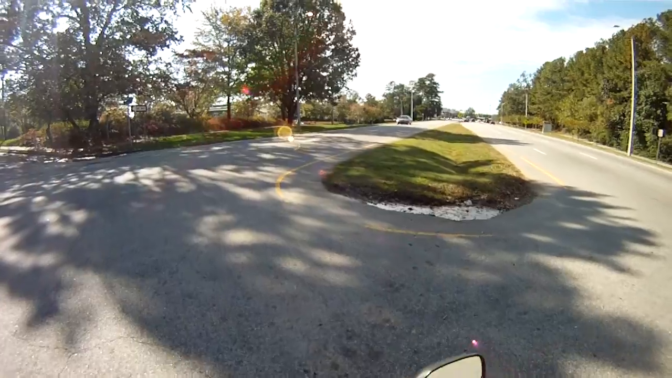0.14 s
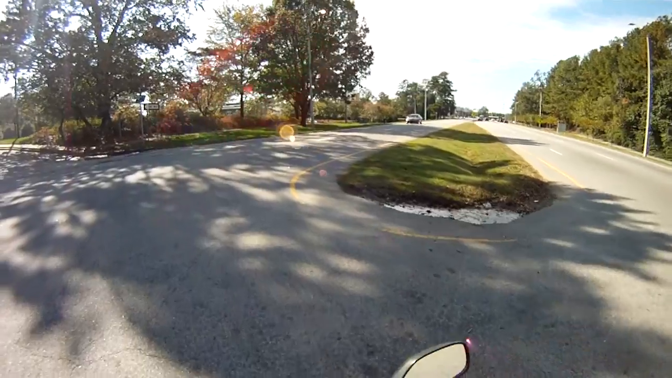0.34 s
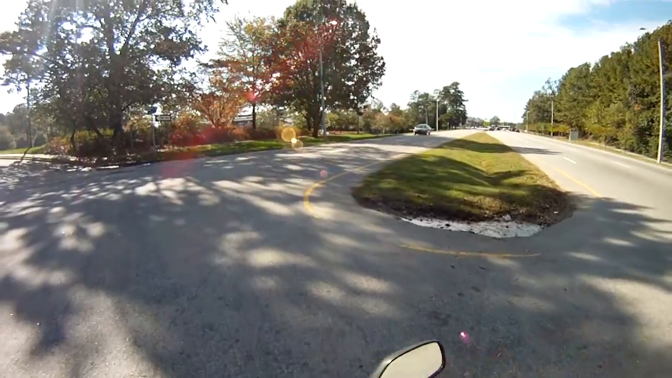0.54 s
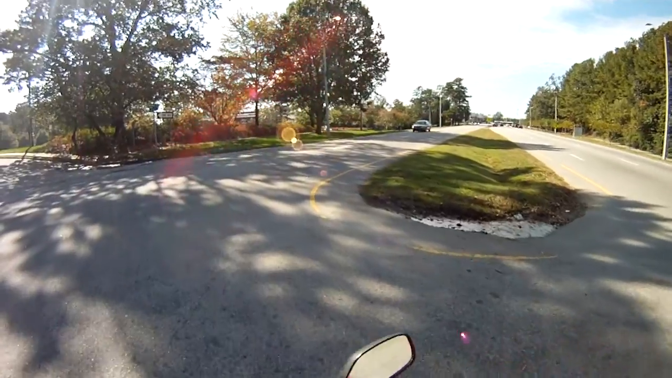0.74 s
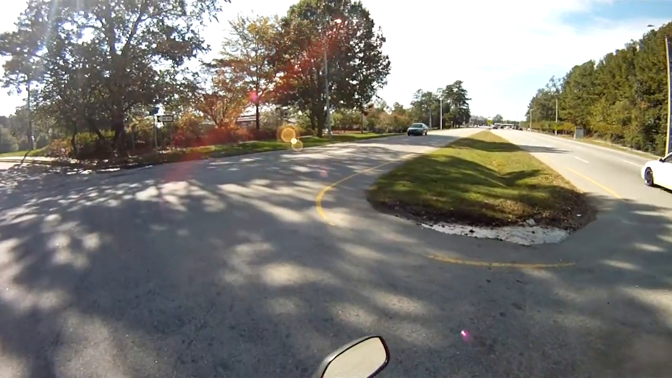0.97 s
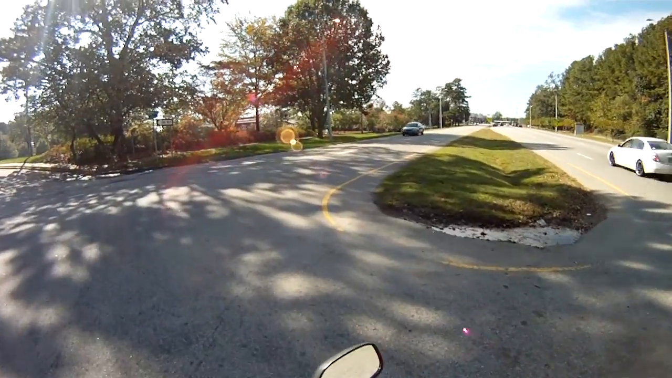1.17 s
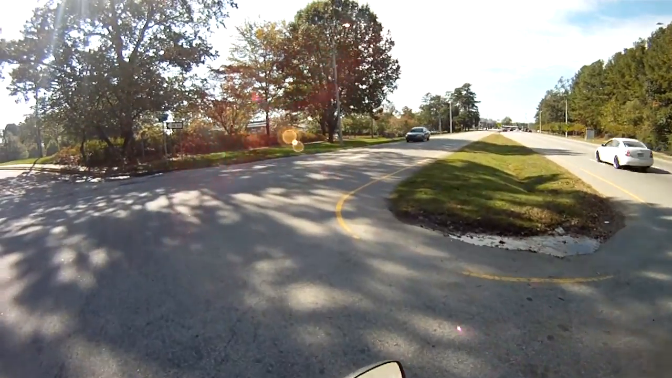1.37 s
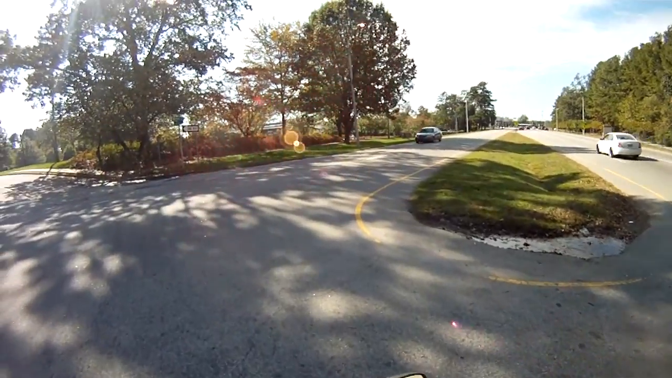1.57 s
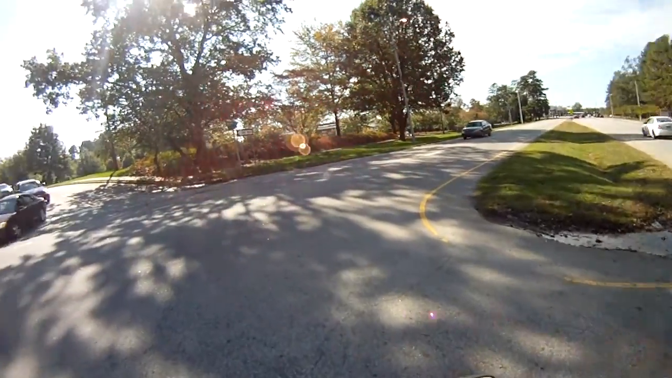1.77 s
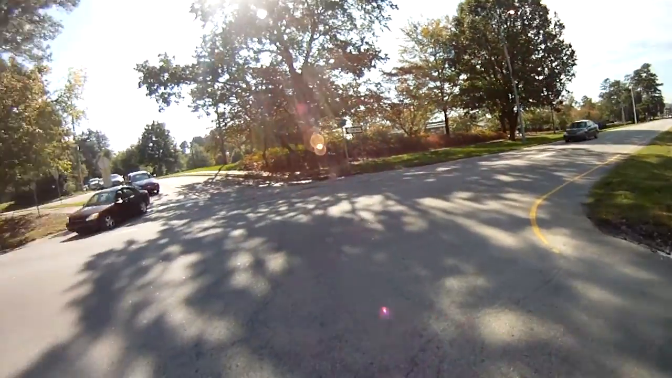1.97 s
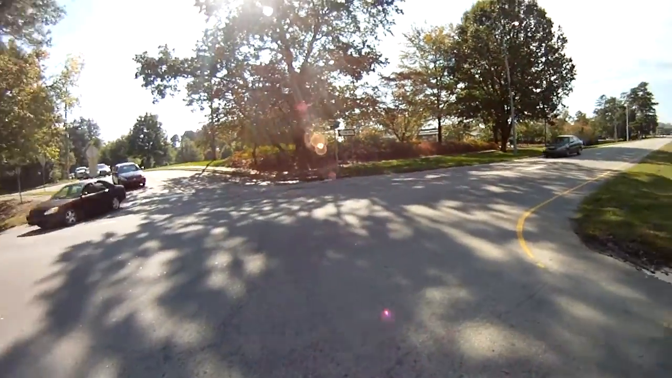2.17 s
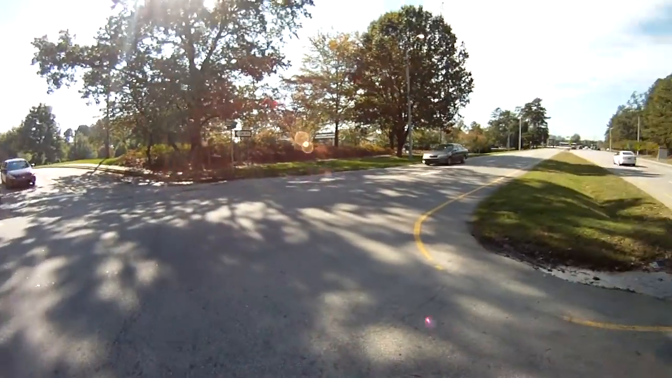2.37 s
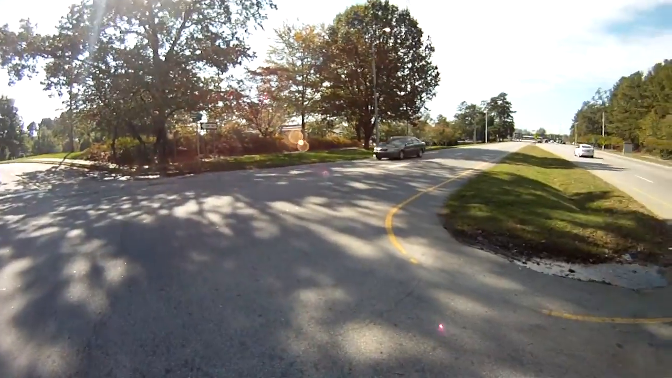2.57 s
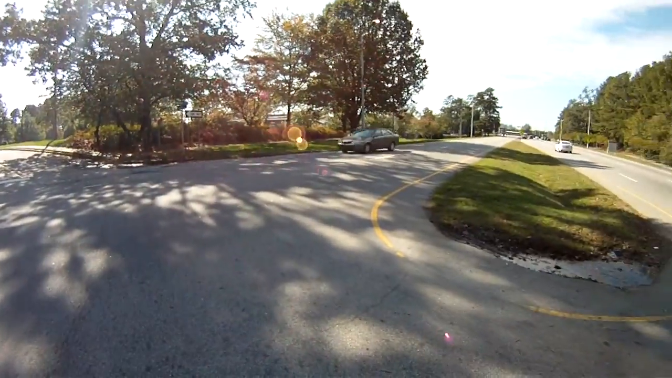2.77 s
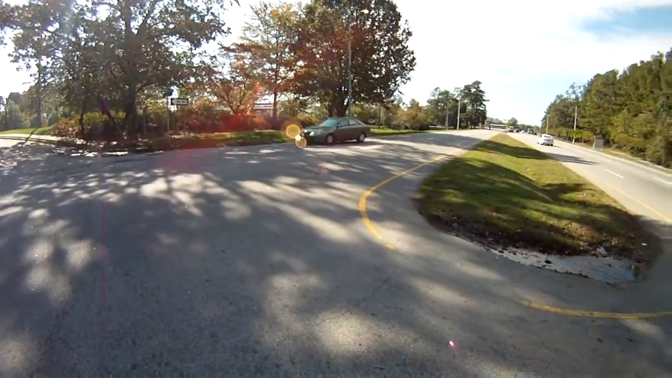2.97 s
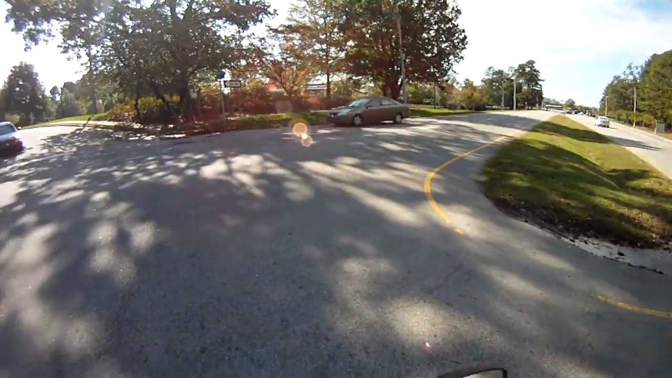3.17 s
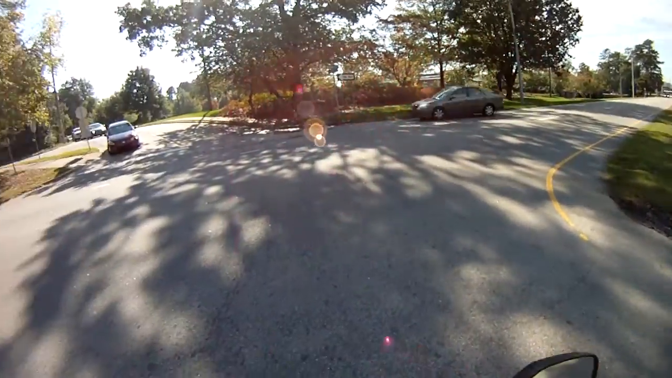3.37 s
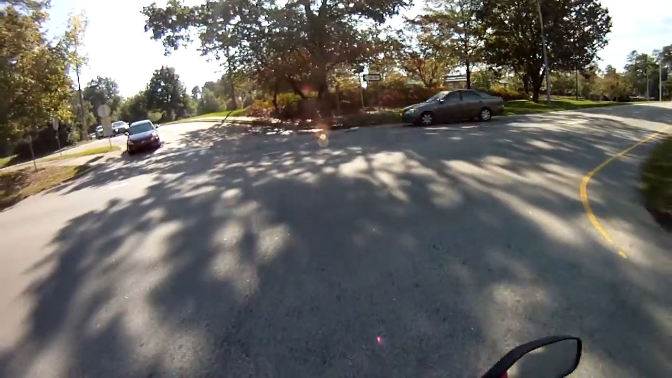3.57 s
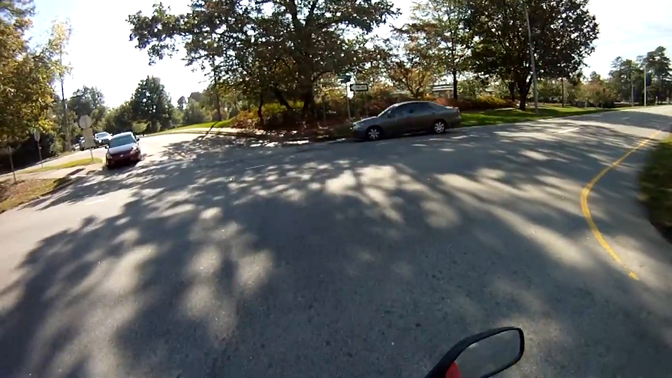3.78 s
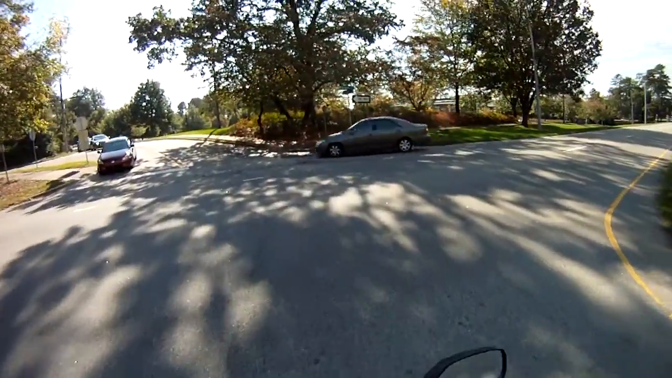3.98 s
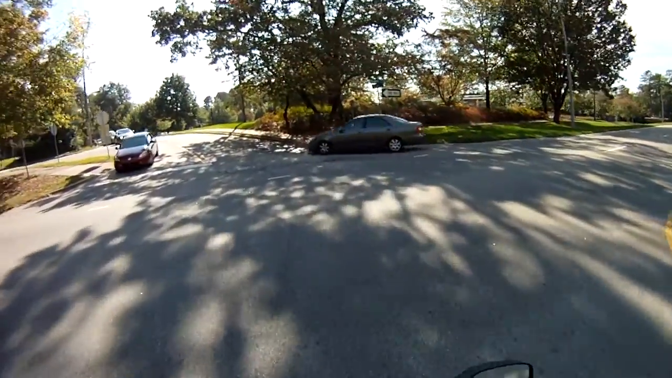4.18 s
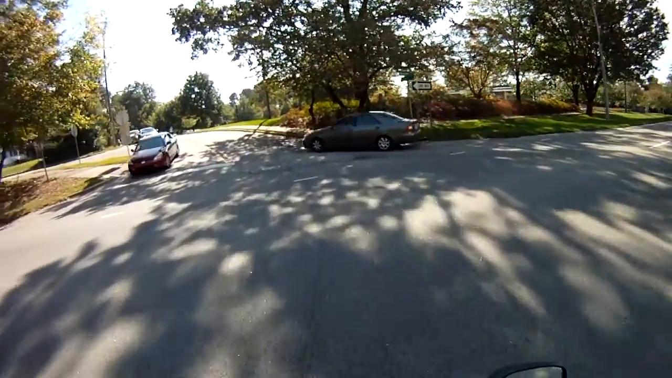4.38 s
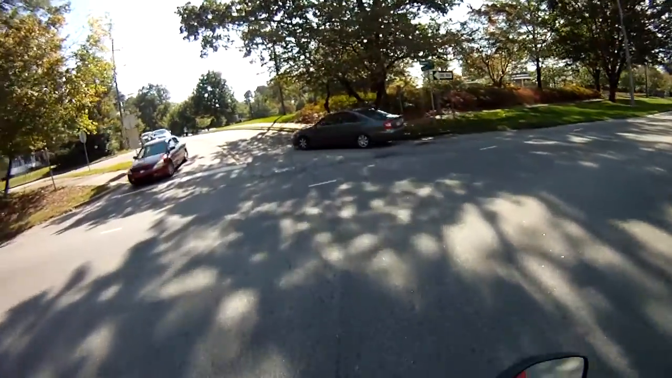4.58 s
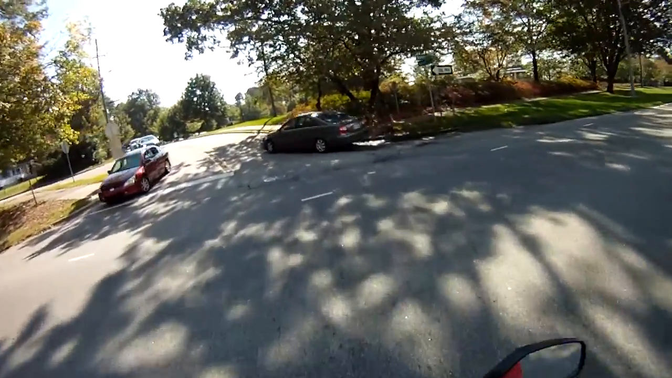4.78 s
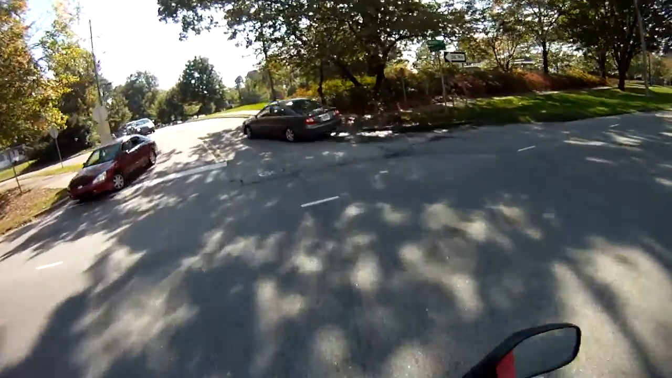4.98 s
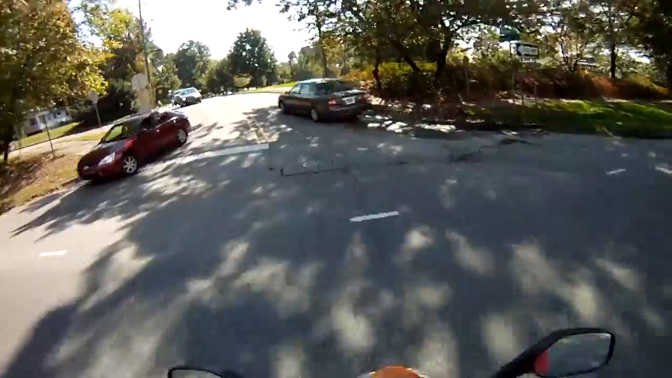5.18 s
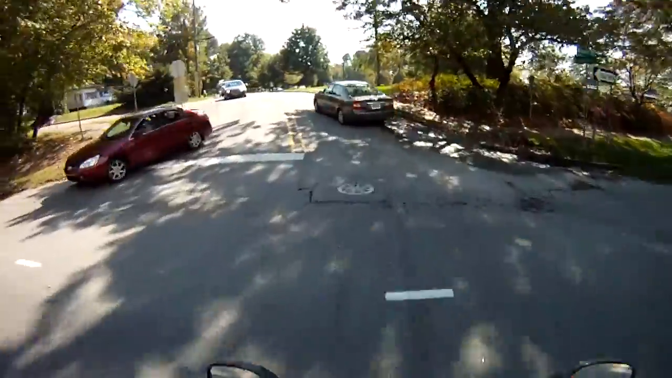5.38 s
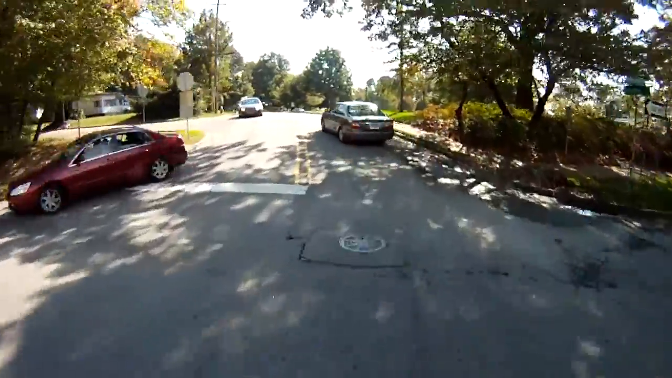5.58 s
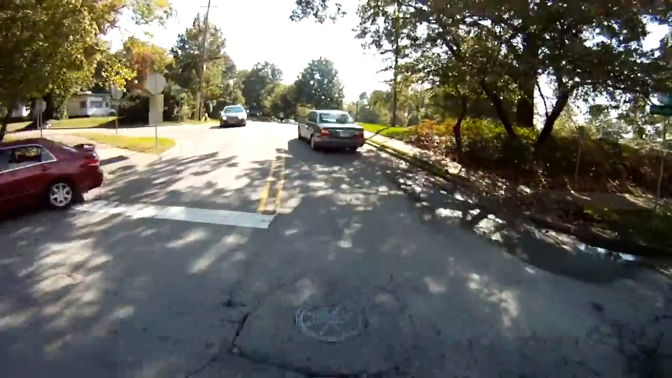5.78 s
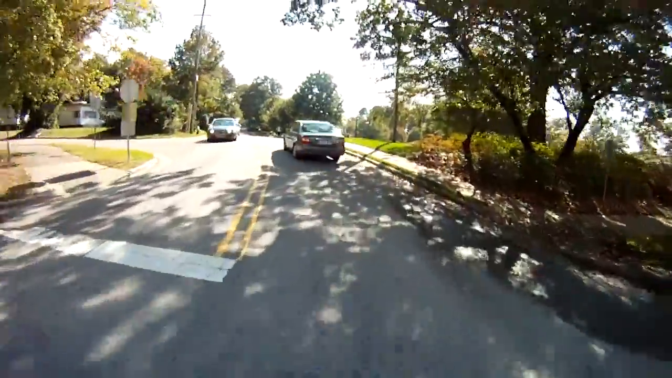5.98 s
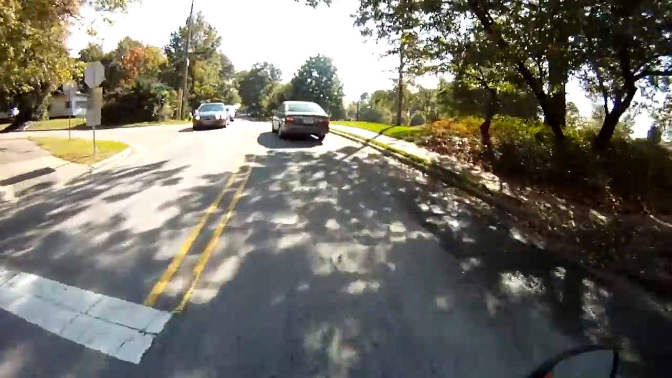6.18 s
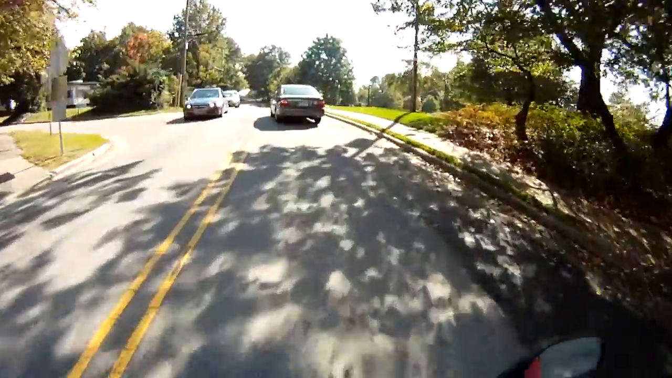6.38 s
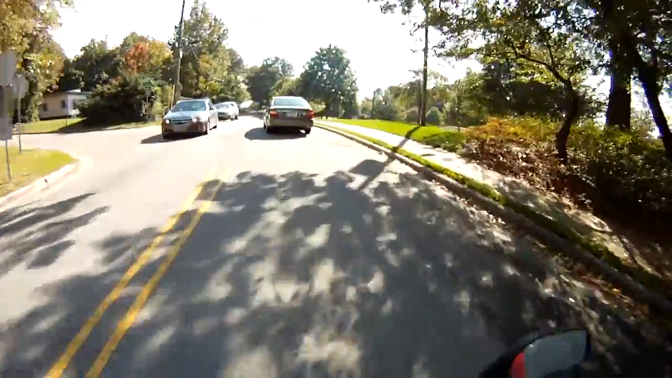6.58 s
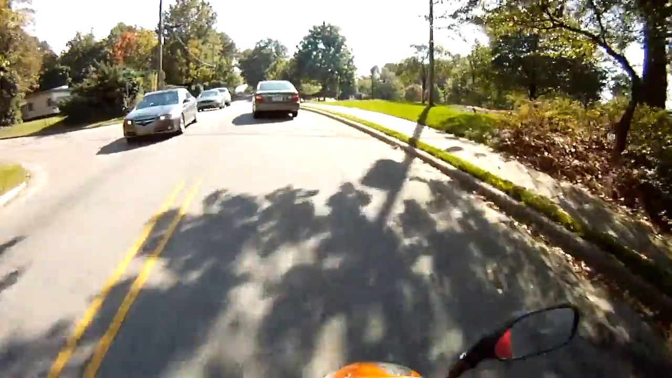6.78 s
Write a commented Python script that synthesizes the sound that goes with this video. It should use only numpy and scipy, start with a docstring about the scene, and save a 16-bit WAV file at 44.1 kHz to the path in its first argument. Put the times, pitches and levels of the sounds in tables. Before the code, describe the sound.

A small two-stroke scooter gives a quick blip of throttle, then winds down towards idle with irregular exhaust pops, a few light ticks and a faint whine. The throttle opens with a low boom and the revs climb sharply into a loud, raspy buzz that dips slightly, rises again and holds. The microphone rides outdoors with the scooter, and gusts of wind thump against it near the end.

```python
"""Two-stroke scooter rounding a bend

From the rider's camera: a blip of throttle, a run-down towards idle with short runs of pops, then
a low boom and a hard buzz as the scooter pulls away. Every firing rings the same exhaust, whose
resonances shift as the gas heats up. The tailpipe sizzles, the intake drones, drive and fan whirr
underneath, a loose part ticks, and a gust on the microphone makes the camera's limiter duck."""
import sys
import numpy as np
from scipy import signal
from scipy.fft import rfft, irfft
from scipy.io import wavfile
from scipy.ndimage import uniform_filter1d

SR = 44100
rng = np.random.default_rng(int(sys.argv[2]) if len(sys.argv) > 2 else 0)


def bounce(signal):
    """Save signal as a 16-bit WAV file at the path given by the first command-line argument."""
    frames = np.transpose(np.atleast_2d(signal))
    limited = np.clip(frames, -1, 1)
    pcm = np.round(limited * 32767).astype(np.int16)
    wavfile.write(sys.argv[1], SR, pcm)


N = 301626
TIME = np.arange(N) / SR
IDLE_HZ = 50.8  # crank turns per second

# relative strength of the firings in the long pull: time_s, bark_db, rasp_db
PULL = [(2.72, -27, -36.5), (2.95, -15, -21.5), (3.15, -15.5, -17.5), (3.35, -15.5, -22), (3.85, -15, -16),
        (4.42, -15.5, -21), (4.75, -14, -16), (5.1, -13, -17.5), (5.3, -17, -22), (6.84, -15.5, -20)]
# runs of pops off the throttle, with their relative strength: start_s, pop_count, first_pop_db
POP_RUNS = [(.0406, 1, -15), (.0521, 1, -15), (.1127, 1, -15), (.1228, 1, -17), (.1582, 1, -14),
            (.5009, 1, -16), (.5935, 1, -17), (.6811, 1, -16), (.7732, 1, -18), (.8416, 1, -17),
            (.912, 1, -20), (.9699, 1, -23), (1.0293, 1, -22), (1.1057, 3, -24), (1.2493, 1, -23),
            (1.366, 1, -22.5), (1.4689, 2, -21), (1.575, 2, -18.5), (1.7011, 2, -20), (1.7929, 2, -18),
            (1.8861, 1, -25), (1.9428, 6, -19.5), (2.1907, 5, -20.5), (2.401, 3, -22), (2.5371, 2, -22.5),
            (2.6156, 1, -24), (2.6746, 1, -22), (2.7129, 1, -24)]
# heat of the exhaust gas: time_s, heat (0 cool, 1 warm, 2 hot)
HEAT = [(2.95, 0.26), (3.3, 0.83), (5.25, 1.54), (5.8, 2)]


def amp(db):
    """Decibels to gain."""
    return 10 ** (np.asarray(db) / 20)


def unit(x):
    """Scales to an rms of one."""
    return x / np.sqrt(np.mean(x ** 2) + 1e-20)


def curve(rows, t, column=1):
    """Reads one column of a table at the times t."""
    rows = np.asarray(rows)
    return np.interp(t, rows[:, 0], rows[:, column])


def spectrum(points, hz):
    """Reads a spectrum in dB on a log-frequency axis."""
    freq_hz, db = np.transpose(points)
    return np.interp(np.log(hz + 1), np.log(freq_hz), db)


def noise(colour):
    """Steady noise of the given colour, at an rms of one."""
    hz = np.fft.rfftfreq(N, 1 / SR)
    return unit(irfft(rfft(rng.standard_normal(N)) * amp(spectrum(colour, hz)), N))


def drift(rate_hz):
    """Slow random motion up to about rate_hz."""
    hz = np.fft.rfftfreq(N, 1 / SR)
    return unit(irfft(rfft(rng.standard_normal(N)) * np.exp(-(hz / rate_hz) ** 2), N))


def clicks(times, sizes):
    """Band-limited impulses, each at its exact time."""
    at = times[:, None] * SR
    index = np.floor(at).astype(int) + np.arange(-7, 9)
    shape = np.sinc(index - at) * np.cos(np.pi * (index - at) / 16) ** 2
    return np.bincount(np.clip(index, 0, N).ravel(), (sizes[:, None] * shape).ravel(), N + 1)[:N]


def engine(speed, turns, bark_trim_db=1.23, pop_bark_db=-15.5, pop_rasp_db=-23.5, weak_pop_body=0.72,
           puff_bark_db=-34, puff_rasp_db=-47, uneven_db=0.42, puff_uneven_db=3, jitter_s=3e-6):
    """One exhaust pulse a turn: strong when it fires, a soft uneven puff when it does not."""
    # peaks and hollows of the silencer with cool, warm and hot gas: freq_hz, width_hz, gain_db
    cool = [(257, 52, -2.5), (382, 25, 8), (516, 98, 8.5), (764, 44, 0), (910, 110, -4.5), (1205, 60, -16),
            (2013, 220, 15.5), (2280, 210, 11.5), (2940, 110, 5), (3500, 270, 0), (4450, 490, -8)]
    warm = [(363, 31, 10.5), (466, 110, 4.5), (477.3, 12.2, -21.5), (713, 50, 4), (955, 47, 6.5),
            (1225, 88, 13.5), (1380, 98, -10.5), (1930, 150, 12), (2296, 280, 13.5), (2680, 66, 8),
            (3370, 210, 3), (4540, 76, -22), (4900, 890, 0.5)]
    hot = [(279.5, 18, 8), (415, 13, -4), (510, 68, -0.5), (642.5, 30, -16), (860, 140, -6),
           (1116.5, 36, 14), (1318, 48, 12.5), (1640, 220, -1.5), (1968, 107, 20.5), (2240, 180, 13),
           (2539, 127, 23), (3784, 33, 7.5), (3702, 175, 16.5), (4360, 380, -13), (5300, 3200, 3.5)]
    turn_s = np.interp(np.arange(1, np.floor(turns[-1])), turns, TIME)
    turn_samples = SR / np.interp(turn_s, TIME, speed)
    size_luck, rasp_luck, time_luck = rng.standard_normal((len(turn_s), 3)).T
    pulse_s = turn_s + jitter_s * time_luck
    firing, open_bark_db, open_rasp_db = throttle(turn_s)
    wobble_db = np.where(firing, uneven_db, puff_uneven_db) * size_luck
    bark_db = np.where(firing, open_bark_db + bark_trim_db, puff_bark_db) + wobble_db
    rasp_db = np.where(firing, open_rasp_db, puff_rasp_db) + wobble_db + uneven_db * rasp_luck
    sizes = amp([bark_db, rasp_db]) * np.sqrt(turn_samples)
    popped, pop_db = pops(turn_s)
    body_db = weak_pop_body * (pop_db.mean() - pop_db)  # a weak pop loses more rasp than bark
    sizes[:, popped] = amp([pop_db + body_db + pop_bark_db, pop_db + pop_rasp_db]) * np.sqrt(SR)
    heat = curve(HEAT, turn_s)
    bark, rasp = np.zeros((2, N))
    for stage, resonances in enumerate((cool, warm, hot)):
        share = np.maximum(1 - abs(heat - stage), 0)  # crossfade as the gas heats up
        for band, size, ring in zip((bark, rasp), sizes, exhaust_rings(resonances)):
            band -= signal.oaconvolve(clicks(pulse_s, size * share), ring)[len(ring) // 2:][:N]
    return bark + road_echo(rasp)


def crank(run_down_s=0.52, waver=0.00084, cruise_waver=0.00223):
    """Crank speed in Hz and angle in turns: it revs, coasts towards idle, then pulls."""
    # revs in the blip and under power: time_s, speed_hz
    blip_revs = [(0, 85), (.16, 86), (.3, 95), (.41, 98)]
    pull_revs = [(2.7, 52.1), (2.78, 56.8), (2.96, 79), (3.07, 98), (3.18, 106.7), (3.42, 115.1),
                 (3.75, 122.1), (4.18, 115.2), (4.41, 113.7), (4.61, 114.8), (5.12, 134.6), (5.41, 138.1),
                 (5.85, 132.7), (6.33, 133.4), (6.65, 136.2), (6.84, 135.1)]
    shut_s, top_hz = blip_revs[-1]
    coasting = IDLE_HZ + (top_hz - IDLE_HZ) * np.exp((shut_s - TIME) / run_down_s)
    speed = np.where(TIME < shut_s, curve(blip_revs, TIME), coasting)
    speed = np.where(TIME < pull_revs[0][0], speed, curve(pull_revs, TIME))
    # the revs waver more at cruising speed as the road bumps; HEAT only lends its timing
    unsteady = np.interp(curve(HEAT, TIME), (1, 2), (waver, cruise_waver))
    speed = uniform_filter1d(speed, size=2000) * (1 + unsteady * drift(13.7))
    turns = np.cumsum(speed) / SR
    # nudge the angle so that every run of pops starts on a whole turn
    run_s = np.asarray(POP_RUNS)[:, 0]
    at_runs = np.interp(run_s, TIME, turns)
    whole = np.cumsum(np.round(np.diff(at_runs, prepend=0)))
    return speed, turns + np.interp(TIME, run_s, whole - at_runs)


def throttle(t):
    """Whether the throttle is open at the times t, and the bark and rasp of the firings in dB."""
    # relative strength of the firings in the blip: time_s, bark_db, rasp_db
    blip = [(0.17, -17.5, -21.5), (0.44, -14, -19)]
    in_blip = (t > blip[0][0] - .005) & (t < blip[-1][0] + .005)
    in_pull = t > PULL[0][0] - .01
    return in_blip | in_pull, curve(blip + PULL, t), curve(blip + PULL, t, column=2)


def pops(turn_s, fade_db=8.5):
    """Off throttle it fires in short runs, every second turn: which turns, and how hard in dB."""
    popped, db = [], []
    for start_s, count, first_db in POP_RUNS:
        k = np.arange(count)
        popped.append(abs(turn_s - start_s).argmin() + 2 * k)
        db.append(first_db - fade_db * (k / max(count - 1, 1)) ** 3)  # holds, then dies on the last pop
    return np.concatenate(popped), np.concatenate(db)


def exhaust_rings(resonances, split_hz=1500, lag_ms=0.697, scatter=0.65, scatter_ms=4, size=4096):
    """What one pulse becomes in the exhaust: a low bark and a high rasp."""
    # colour of one pulse: freq_hz, level_db
    colour = [(30, -25), (65, 7.5), (120, 9), (220, -2.5), (380, 6.5), (520, 3.5), (700, 7), (1000, -3),
              (1450, -13), (2300, -17), (3500, -10.5), (4400, -23), (5200, -28), (6000, -30.5)]
    # reflections from the pipe ends and the road: delay_ms, gain
    reflections = [(1.744, 0.39), (3.481, 0.04), (4.198, 0.25)]
    hz, t = np.fft.rfftfreq(size, 1 / SR), np.arange(size) / SR
    silencer_db = sum(db / (1 + (2 * (hz - centre) / width) ** 2) for centre, width, db in resonances)
    log_gain = np.log(amp(spectrum(colour, hz) + silencer_db))
    mirrored = np.r_[log_gain, log_gain[-2:0:-1]]
    ring = np.exp(signal.hilbert(mirrored).conj())[:len(hz)]  # causal: sharp front, ringing tail
    ring *= 1 + sum(gain * np.exp(-2j * np.pi * hz * ms / 1000) for ms, gain in reflections)
    low = 1 / (1 + (hz / split_hz) ** 8)
    # short waves scatter off the bodywork
    tail = rng.standard_normal(size) * np.exp(-1000 * t / scatter_ms)
    ring *= 1 + scatter * (1 - low) * rfft(tail / np.linalg.norm(tail))
    # and straggle out of the baffles a little later than long ones
    lag_s = lag_ms / 1000 * np.minimum(hz / 6000, 1)
    ring *= np.exp(-2j * np.pi * np.cumsum(lag_s) * hz[1])
    bands = [np.roll(irfft(ring * share), size // 2) for share in (low, 1 - low)]
    return [band / np.linalg.norm(band) for band in bands]


def road_echo(x, delay_ms=2.403, sway_ms=0.17, strength=0.57):
    """A bounce off the road whose path changes as the scooter sways, so the buzz shimmers."""
    late_s = (delay_ms + sway_ms * drift(1.5)) / 1000
    return (x + strength * np.interp(TIME - late_s, TIME, x)) / np.hypot(1, strength)


def sizzle(speed, turns, decay_turns=1.0, warm_db=-16, hot_db=-5.5, idle_db=-63, db_per_octave=20):
    """Gas spurts from the tailpipe each turn; under power it follows the rasp and grows when hot."""
    # colour of the rushing gas: freq_hz, level_db
    colour = [(1200, -66), (2000, 3.5), (2800, 6), (3700, 7.5), (4400, -6.5), (5000, 2), (6000, -10)]
    is_open, _, rasp_db = throttle(TIME)
    driven_db = rasp_db + np.interp(curve(HEAT, TIME), (1.7, 2), (warm_db, hot_db))
    coasting_db = idle_db + db_per_octave * np.log2(speed / IDLE_HZ)
    spurts = .5 + np.exp(-(turns % 1) / decay_turns)
    return unit(noise(colour) * spurts) * amp(np.where(is_open, driven_db, coasting_db))


def intake(speed, turns, idle_db=-31, db_per_octave=8.0, fade_db_per_s=95, waver_db=4.5, harmonics=15):
    """The piston pumps against the shut throttle: a drone that sinks with the revs, gone in the pull."""
    # colour of the drone: freq_hz, level_db
    colour = [(50, -13), (90, -9), (170, -11), (250, -15), (310, -1), (370, 2), (440, -3), (520, 1),
              (600, -4), (780, -13), (1100, -28)]
    drone = np.zeros(N)
    for k in range(1, harmonics + 1):
        harmonic_db = spectrum(colour, k * speed) + waver_db * drift(6.6)
        drone += amp(harmonic_db) * np.cos(2 * np.pi * (k * turns + rng.random()))
    fade_db = fade_db_per_s * np.maximum(TIME - PULL[0][0], 0)
    return unit(drone) * amp(idle_db + db_per_octave * np.log2(speed / IDLE_HZ) - fade_db)


def drive(turns, throb=0.11):
    """Belt, fan and tyres whirr, throbbing with the crank."""
    # colour of the whirr: freq_hz, level_db
    colour = [(100, -10), (250, -7.5), (380, -3), (540, -3), (760, -8), (870, -14.5), (1200, -13),
              (1450, -16), (2310, -12.5), (3500, -19), (4420, -30.5), (5900, -36.5)]
    # its fader: time_s, level_db
    fader = [(0, -21), (.45, -22), (1.7, -31.5), (2.6, -33.5), (3, -25.5), (4, -27), (6.84, -27)]
    return noise(colour) * amp(curve(fader, TIME)) * (1 + throb * np.cos(2 * np.pi * turns))


def fan(turns, blades=12):
    """The cooling fan on the crank whines at the rate its blades pass."""
    # fader of the whine: time_s, level_db
    fader = [(0, -68), (1.5, -36.5), (2.6, -41), (2.9, -60)]
    return np.sqrt(2) * amp(curve(fader, TIME)) * np.sin(2 * np.pi * blades * turns)


def loose_part(decay_s=0.0052):
    """A loose part ticks: bright bursts of noise that die at once."""
    # the ticks: start_s, level_db
    ticks = [(0.532, -20.5), (0.621, -18), (0.712, -24)]
    # their colour: freq_hz, level_db
    colour = [(500, -20), (1500, -19), (2300, 2), (4000, -1), (5500, -13)]
    envelope = sum(amp(db) * (TIME > start) * np.exp(-abs(TIME - start) / decay_s) for start, db in ticks)
    return envelope * noise(colour)


def wind(rumble_db=-2.0, gusty_db=2, lumpy_db=2):
    """Turbulence at the microphone: a gusty rumble and a lumpy flutter."""
    # strength of the wind: time_s, level_db
    fader = [(0, -27.5), (2.1, -32), (2.85, -27), (3.55, -48), (4.1, -29), (5, -40), (5.42, -12),
             (6, -22.5), (6.84, -23)]
    # colours of the rumble and the flutter: freq_hz, level_db
    rumble_colour = [(12, -9), (28, -7), (48, 12), (75, 5.5), (110, 2), (200, -36), (500, -49)]
    flutter_colour = [(40, -25), (90, -0.5), (170, -1.5), (300, -4), (500, -8), (900, -40), (3000, -55),
                      (9000, -70)]
    strength_db = curve(fader, TIME)
    rumble = noise(rumble_colour) * amp(strength_db + rumble_db + gusty_db * drift(6))
    flutter = noise(flutter_colour) * amp(strength_db + lumpy_db * drift(32))
    return rumble + flutter


def boom_and_buffets():
    """The engine's firing note booms low as the throttle opens; later, wind buffets the microphone."""
    # the engine's boom (first row), then the wind buffets: centre_s, length_s, pitch_hz, peak_db
    swells = [(2.796, .16, 57.8, -20), (3.44, .14, 48, -26), (4.34, 0.28, 46.3, -22.5),
              (5.145, .05, 115, -10), (5.324, 0.023, 170, -7.5), (5.412, 0.023, 150, -6),
              (5.449, 0.018, 80, 1), (5.734, 0.015, 122, -1), (5.799, 0.021, 125, -8.5)]
    thumps = np.zeros(N)
    for centre_s, length_s, pitch_hz, peak_db in swells:
        swell = amp(peak_db) * np.exp(-(2 * (TIME - centre_s) / length_s) ** 2)
        thumps += swell * np.sin(2 * np.pi * (pitch_hz * TIME + rng.random()))
    return thumps


def limiter(x, threshold_db=-12, recover_db_per_s=27.5):
    """Ducks everything quickly when the sound passes the threshold, then recovers slowly."""
    power_db = 10 * np.log10(abs(uniform_filter1d(x[0] ** 2, size=900)) + 1e-12)
    recovery_db = recover_db_per_s * TIME
    held_db = np.maximum.accumulate(power_db + recovery_db) - recovery_db
    over_db = np.maximum(held_db - threshold_db, 0)
    return x / amp(uniform_filter1d(over_db, size=700))


def scene():
    """Engine, drive and wind at one microphone."""
    speed, turns = crank()
    motor = engine(speed, turns) + intake(speed, turns) + fan(turns) + sizzle(speed, turns)
    return (motor + drive(turns) + loose_part() + wind() + boom_and_buffets())[None]


def record(dry):
    """The camera limits, rounds off peaks and holds 12 kHz samples, mirroring buzz into glassy treble."""
    ducked = limiter(dry)
    rounded = ducked / (1 + ducked ** 6) ** (1 / 6)
    coarse = signal.resample_poly(rounded, 12000, SR, axis=1)
    held = signal.resample_poly(np.repeat(coarse, 4, axis=1), SR, 48000, axis=1)[:, :N]
    high_cut = signal.firwin(511, cutoff=15400, window=("kaiser", 9), fs=SR)
    return signal.oaconvolve(held, high_cut[None], "same")


dry = scene()
out = record(dry)
bounce(out)
```